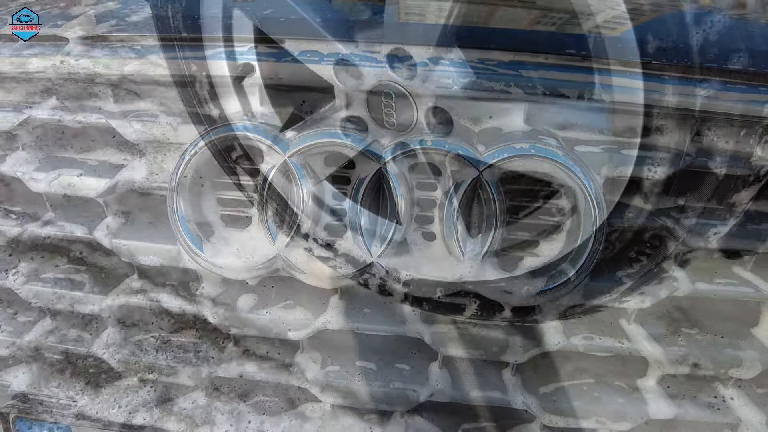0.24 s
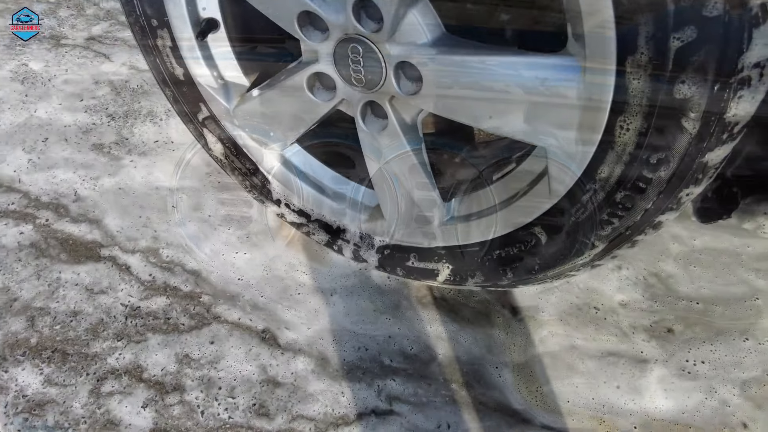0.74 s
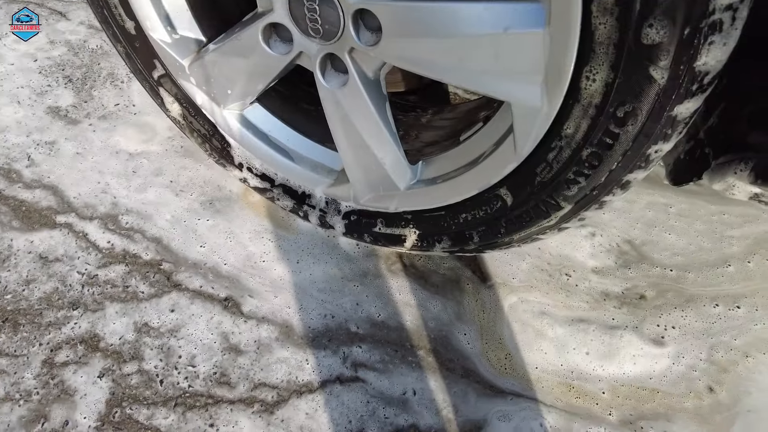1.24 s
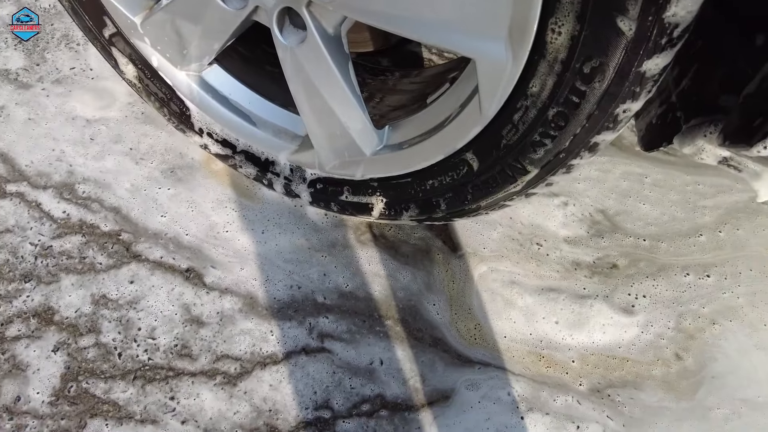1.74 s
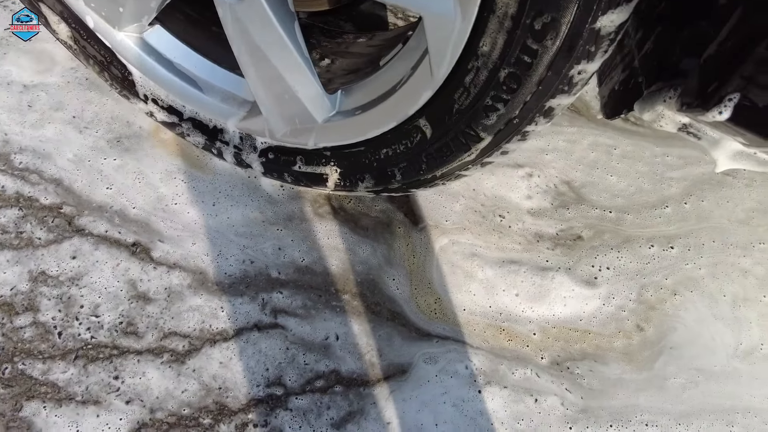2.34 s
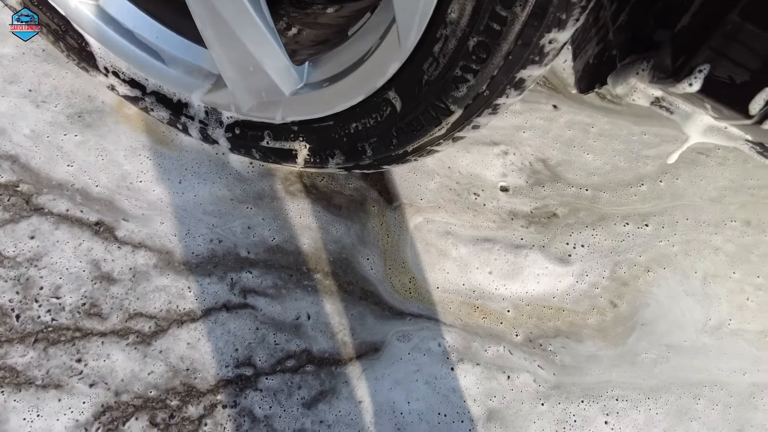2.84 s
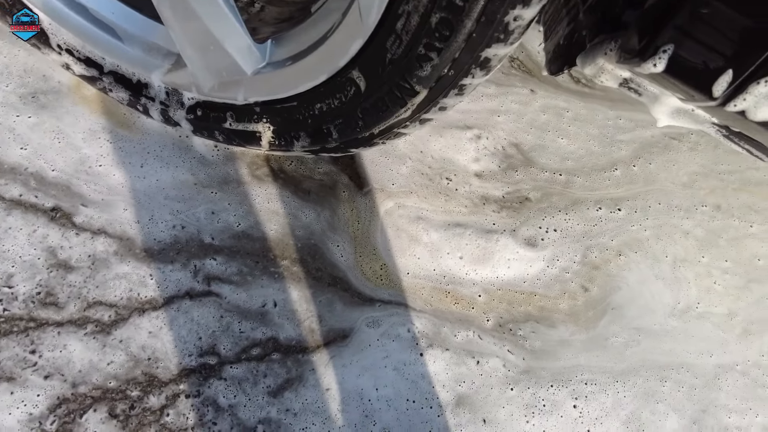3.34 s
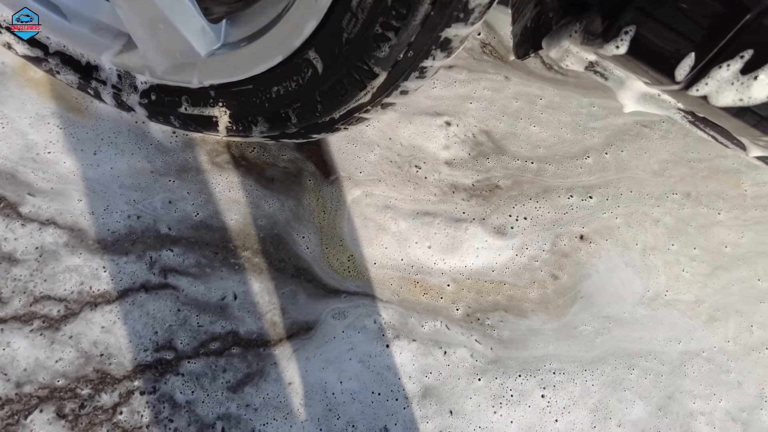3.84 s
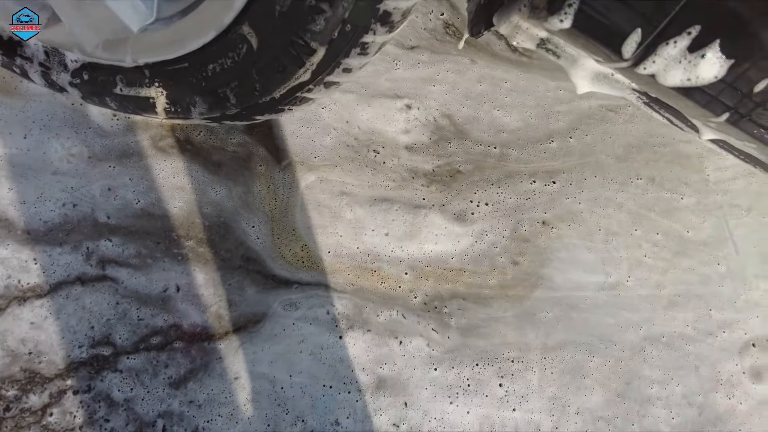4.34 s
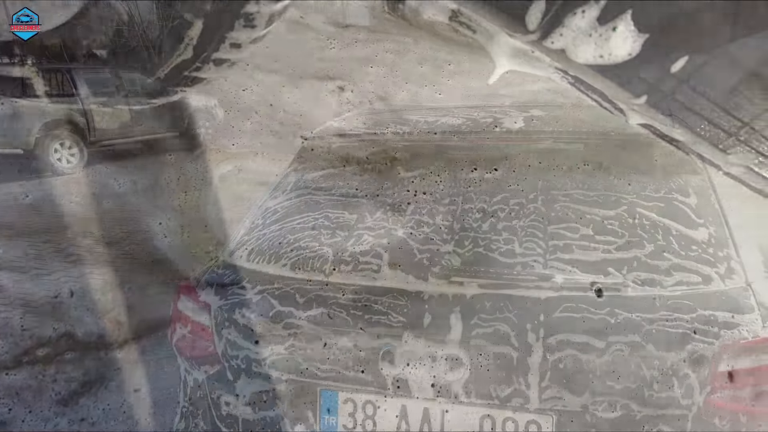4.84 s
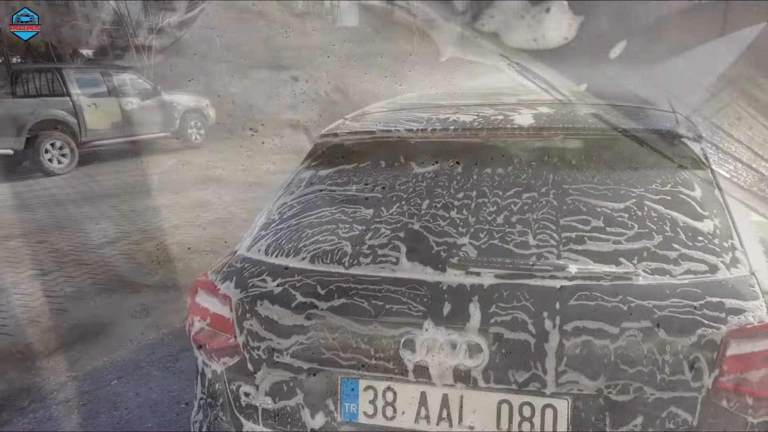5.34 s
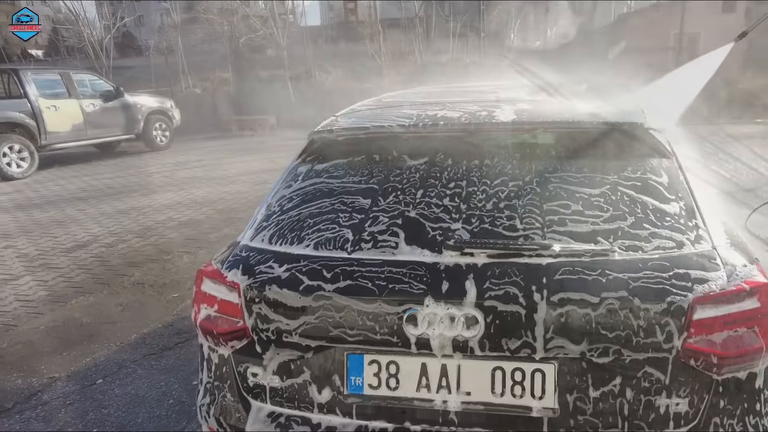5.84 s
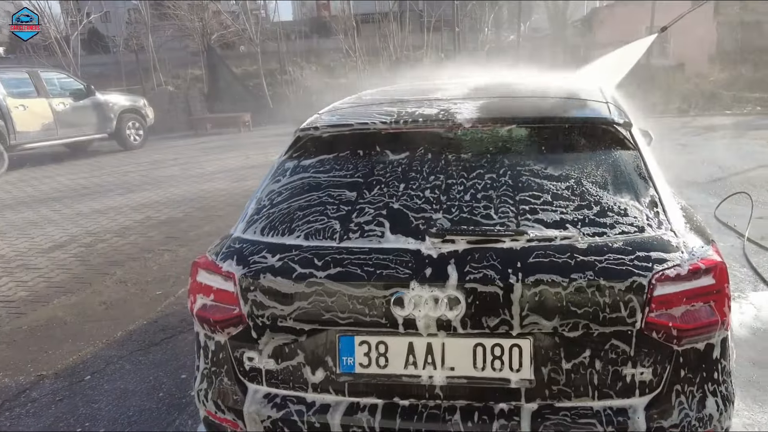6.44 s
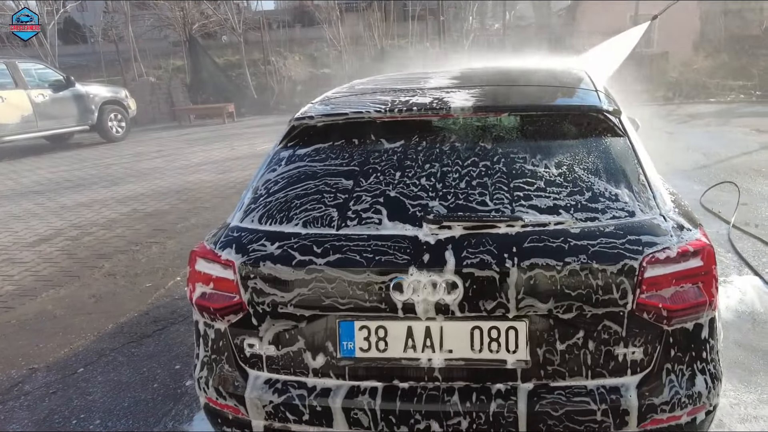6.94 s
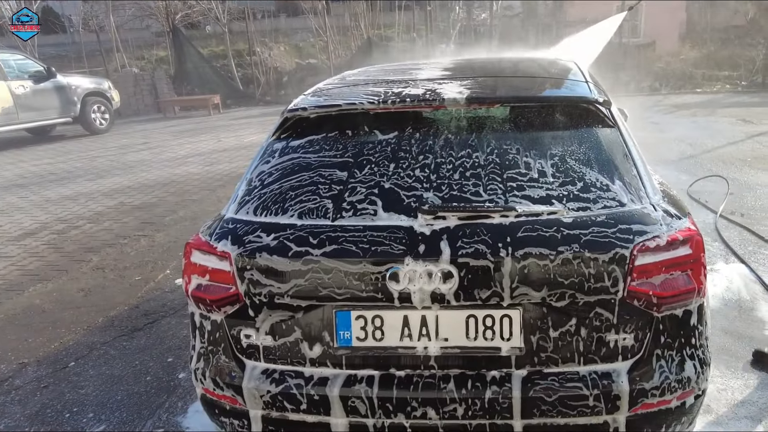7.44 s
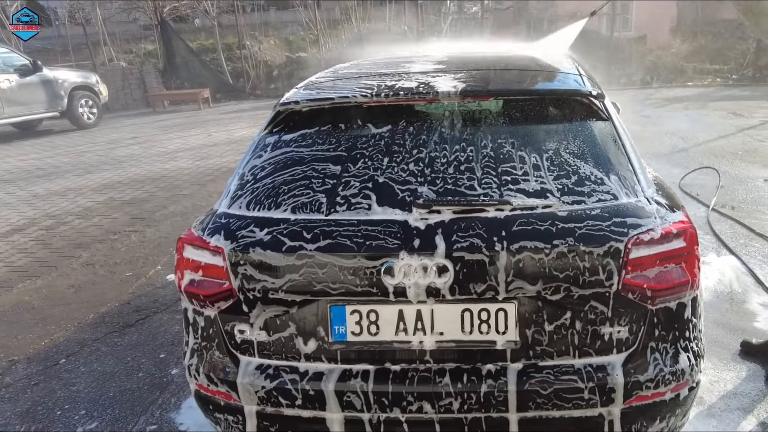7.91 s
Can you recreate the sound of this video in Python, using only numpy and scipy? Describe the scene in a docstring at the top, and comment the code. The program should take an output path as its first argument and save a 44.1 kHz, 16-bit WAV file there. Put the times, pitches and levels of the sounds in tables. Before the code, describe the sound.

After a split second of wind, a pressure washer jet cuts in close to a stereo microphone, hissing and splashing on a car wheel. The hiss swishes and turns hollow as it moves into the wheel well, growing louder. A hard cut brings a softer, more distant spray on the roof, which swells with a brief drumming boom on the rear, then eases. A faint pump hums underneath, outdoors.

```python
"""A pressure washer rinses a car outdoors, heard through a stereo microphone. Hard cuts join a moment of
wind, the jet close up on a wheel, and the jet farther off on the roof, briefly drumming on the rear window.
The nozzle hisses, droplets splash and drum, and wheel well and panels resonate. Echoes off wet ground and
bodywork comb the hiss as the lance moves; the piston pump hums and wind nudges the microphone."""
import sys
import numpy as np
from scipy import signal
from scipy.fft import rfft, irfft
from scipy.io import wavfile
from scipy.ndimage import uniform_filter1d

SR = 44100
rng = np.random.default_rng(int(sys.argv[2]) if len(sys.argv) > 2 else 0)


def transcribe(signal):
    """Save signal, clipped to [-1, 1], as a 16-bit WAV file at the path in sys.argv[1]."""
    frames = np.atleast_2d(signal).T
    limited = np.clip(frames, -1, 1)
    pcm = np.round(limited * 32767).astype(np.int16)
    wavfile.write(sys.argv[1], SR, pcm)


N = 360297
TIME = np.arange(N) / SR
HZ, FRAME_S, _ = signal.stft(TIME, SR, nperseg=1024, noverlap=768)

# aim at the wheel [t/s, depth (0 on the face, 1 deep in the well), bodywork echo delay/ms, its share]
AIM = [(.2, 0, 1.95, .13), (.6, .02, 1.95, .12), (1.8, .61, 1.68, .13), (2.7, .615, 1.58, .06),
       (3.2, .77, 1.48, .06), (3.9, .89, 1.3, .13), (4.15, .93, 1.12, .15), (4.32, .98, 1.01, .34),
       (4.45, 1.03, .92, .3), (4.58, 1, .79, .2), (4.8, .93, .69, .2), (5.15, .94, .7, .26)]


def gain_of(db):
    return 10 ** (np.asarray(db) / 20)


def unit_rms(x):
    return x / np.sqrt(np.mean(x ** 2) + 1e-20)


def over_hz(points):
    """A spectrum table as a column over the frequency bins."""
    hz, value = np.transpose(points)
    return np.interp(np.log(HZ + 1), np.log(hz), value)[:, None]


def over_time(rows):
    """Each column of a curve table over the frames."""
    s, *columns = np.transpose(rows)
    return [np.interp(FRAME_S, s, column) for column in columns]


def to_spectra(x):
    return signal.stft(x, nperseg=1024, noverlap=768)[2]


def to_sound(z):
    return signal.istft(z, nperseg=1024, noverlap=768)[1][..., :N]


def colour(points, lo_hz=0, hi_hz=SR):
    """Gains that give white noise an rms of 1 within a band."""
    gain = gain_of(over_hz(points))
    return gain / np.sqrt(np.mean(gain[:, 0] ** 2 * ((HZ >= lo_hz) & (HZ <= hi_hz))))


def slow_noise(edge_hz):
    """Noise of rms 1 that dies away above edge_hz."""
    hz = np.fft.rfftfreq(N, 1 / SR)
    return unit_rms(irfft(rfft(rng.standard_normal(N)) / np.sqrt(1 + (hz / edge_hz) ** 6), N))


def bump(hz, width_hz):
    """Bell-shaped weight around a steady or moving frequency."""
    return np.exp(-((HZ[:, None] - hz) / width_hz) ** 2 / 2)


def swell(s, half_s):
    """A smooth rise and fall around the moment s."""
    return np.exp(-((FRAME_S - s) / half_s) ** 2)


def modes_db(modes):
    """Lift of steady resonances; negative dB is a hollow between them."""
    return sum(db * bump(hz, width_hz) for hz, width_hz, db in modes)


def between(start_s, end_s):
    """1 between two hard cuts, 0 outside."""
    return uniform_filter1d(1. * ((TIME >= start_s) & (TIME < end_s)), size=6)


def echo(delay_ms, share, blur_hz):
    """One reflection; the spray is a wide patch, so its treble comes back smeared."""
    hz, delay_s = HZ[:, None], np.array(delay_ms)[:, None] / 1000
    return share / np.sqrt(1 + (hz / blur_hz) ** 2) * np.exp(-2j * np.pi * hz * delay_s)


def comb(*echoes):
    """Direct sound plus reflections, at unchanged mean power."""
    return (1 + sum(echoes)) / np.sqrt(1 + sum(abs(e) ** 2 for e in echoes))


def open_air(level_db=-52):
    """Dull outdoor background while the trigger is released."""
    # ambience of the yard [f/Hz, level/dB]
    spectrum = [(30, 7.5), (150, -5), (300, -11), (1000, -9), (2000, -21), (4500, -35), (8000, -48),
                (16000, -45)]
    return gain_of(level_db) * to_sound(to_spectra(rng.standard_normal(N)) * colour(spectrum))


def wind():
    """Short low buffets on the microphone."""
    # puffs of wind [t/s, half length/s, level/dB, upper edge/Hz]
    gusts = [(.05, .09, -40, 75), (.95, .026, -35, 150), (3.99, .013, -36, 90), (4.86, .03, -34.5, 150),
             (5.13, .05, -33.5, 260), (6.9, .04, -62, 180), (8.02, .11, -53, 100)]
    buffets = sum(gain_of(db) * np.exp(-((TIME - s) / half_s) ** 2) * slow_noise(hz)
                  for s, half_s, db, hz in gusts)
    return signal.sosfilt(signal.butter(2, 15, "high", fs=SR, output="sos"), buffets)


def droplets(turns, drops_per_s, drop_db, sputter_db, throb):
    """Two streams of countless tiny impacts and a few big drops, pulsing with the pump's pistons."""
    big_drops = (rng.random((2, N)) < drops_per_s / SR) * rng.standard_normal((2, N))
    streams = rng.standard_normal((2, N)) + gain_of(drop_db) * big_drops
    pressure = 1 + throb * (np.cos(2 * np.pi * turns) + 0.24 * np.cos(8 * np.pi * turns))
    sputter = gain_of(sputter_db * (slow_noise(92) + 1.2 * slow_noise(11)))
    return to_spectra(unit_rms(streams * pressure * sputter))


def jet(strength, hiss, splash, drum, hiss_db, splash_db, drum_db, patchy_db, mist_hz):
    """Nozzle hiss, splash and drumming follow the jet's strength; a square strike lifts the last two."""
    # hits on a panel, grazing where negative [t/s, half length/s, extra splash/dB, extra drumming/dB]
    strikes = [(0.886, 0.14, 1.5, 2.5), (1.298, 0.28, 3, 4.5), (1.935, 0.18, 0, 2), (2.85, 0.5, -3, -1.5),
               (3.99, 0.13, -1, 1.5), (4.733, 0.084, 2.5, 2.5), (5.12, 0.059, 2, 4), (5.79, 0.031, -5, 3),
               (5.914, 0.072, -2, 11), (6.093, 0.098, 7.5, 12.5), (6.236, 0.054, 2, 7),
               (6.33, 0.058, 2, 14.5), (7.237, 0.25, 0.5, 3), (7.973, 0.12, -3.5, -5),
               (8.152, 0.06, -10, 4)]
    level_db, mist_db = over_time(strength)
    top_db = (mist_db - mist_db.mean()) * over_hz([(mist_hz[0], 0), (mist_hz[1], 1)])  # mist is bright
    more_splash, more_drum = sum(np.outer(extra_db, swell(s, half_s)) for s, half_s, *extra_db in strikes)
    parts = [colour(hiss, 2500, 7000) * gain_of(hiss_db + top_db),
             colour(splash) * gain_of(splash_db + more_splash),
             colour(drum) * gain_of(drum_db + more_drum)]
    patch = np.outer(np.hanning(14), np.hanning(22))  # bins by frames
    flicker = unit_rms(signal.fftconvolve(rng.standard_normal(top_db.shape), patch, "same"))
    return np.sqrt(sum(part ** 2 for part in parts)) * gain_of(level_db + patchy_db * flicker)


def microphone(streams, likeness, balance, bearing):
    """The spray reaches two coloured ports, one a little before the other, and only partly alike."""
    # the microphone's widening of the stereo image [f/Hz, factor]
    widening = [(100, 15), (300, 12), (600, 8), (800, 13), (930, 26), (1060, 10), (1170, 5), (1240, 1.2),
                (2000, .8), (3000, 1.2), (5000, 1)]
    # resonances of its ports [f/Hz, width/Hz, level/dB]
    port_modes = [(1050, 214, 0.5), (1200, 178, 3.5), (1700, 60, 2.2), (2230, 490, 0.5), (3020, 370, 3.5),
                  (3650, 300, 0.5), (4330, 274, 3), (6280, 810, 1), (7040, 370, -2), (7800, 350, 2),
                  (8600, 250, 0), (9370, 280, 3.5), (10840, 200, 2.5)]
    drum_ms, hiss_ms, pan_db, focus = over_time(bearing)
    treble = over_hz([(1000, 0), (2000, 1)])
    lead_ms = drum_ms + (hiss_ms - drum_ms) * treble
    half_phase = np.pi * HZ[:, None] * lead_ms / 1000
    turn = np.exp(1j * np.arctan2(over_hz(widening) * np.sin(half_phase), np.cos(half_phase)))
    alike = np.clip(over_hz(likeness) + focus * treble, 0, 1)
    common, apart = np.sqrt((1 + alike) / 2) * streams[0], np.sqrt((1 - alike) / 2) * streams[1]
    lean = gain_of((over_hz(balance) + pan_db) * over_hz([(60, 0.15), (200, 0.73)]))  # bass stays central
    pair = np.array([(common + apart) * turn * lean, (common - apart) / turn])
    return pair * gain_of(modes_db(port_modes)) * np.sqrt(2 / (1 + lean ** 2))


def with_aim(face, deep, bend=1):
    """A value that glides as the jet moves from the face of the wheel into the well."""
    return face + (deep - face) * over_time(AIM)[0] ** abs(bend)


def spokes(count=4):
    """Brief bright echoes off the spokes; they come and go and glide, so the hiss swishes."""
    glints = []
    for delay_ms, glide_ms, phase in rng.uniform([.8, -.5, 0], [3.5, .5, 1], (count, 3)):
        facing = np.sin(2 * np.pi * (FRAME_S / delay_ms + phase))
        glints.append(echo([delay_ms + glide_ms * np.sin(FRAME_S)], share=.09 * facing, blur_hz=9000))
    return sum(glints) * over_hz([(1200, 0), (2400, 1)])


def wheel_rings():
    """The wheel well hoots and the rim rings; brief bands of brighter hiss glide, the rising ones with the
    phasing sweep as the bodywork echo shortens."""
    # modes of wheel and well [face f/Hz, deep f/Hz, bend of glide, width/Hz, face level/dB, deep level/dB]
    rings = [(300, 426, 1, 108, 0, -4), (398, 254, 2.7, 36, 5, 1.5), (710, 680, 1.9, 76, -7, 3.6),
             (1106, 406, 1.05, 112, 4.5, 5), (1380, 960, 0.31, 38, -8, -1.5), (1540, 1290, 1.3, 50, 3, 2.5)]
    # brief gliding bands of brighter hiss; the rising ones follow the phasing sweep as the bodywork echo
    # shortens [t/s, half length/s, f/Hz, glide/(Hz/s), width/Hz, level/dB]
    bright_bands = [(0.21, 0.28, 850, 0, 110, 1), (0.65, 0.57, 1700, -30, 67, 1), (.75, 0.88, 600, -70, 42, 2.5),
                    (0.95, 0.25, 1255, -200, 40, 3.5), (0.6, 0.4, 2600, 0, 300, 1.5),
                    (0.94, 0.22, 2170, -400, 70, 6.5), (1.06, 0.11, 2800, 0, 450, 1.5),
                    (1.86, 0.19, 2000, 0, 160, 3.5), (2.4, .55, 2100, 0, 120, 3),
                    (2.8, 0.71, 1320, -125, 43, 2.5), (2.9, 0.64, 608, 0, 31, 7), (4.1, 1, 880, -130, 90, 5),
                    (2.45, .4, 6370, 0, 110, 2.5), (2.6, 0.17, 5800, -0.5, 130, 2),
                    (2.78, .16, 5800, 0, 770, 2.5), (3.3, 0.55, 6800, 0, 1200, 3),
                    (3.2, .4, 14500, 0, 1500, 2.5), (4.06, 0.21, 560, 0, 27, 9), (3.93, .14, 5000, 0, 1100, 1.5),
                    (4.39, 0.22, 1020, -200, 31, 3.5), (4.33, 0.056, 3260, 1494, 100, 6.5),
                    (4.36, 0.091, 4160, 1600, 150, 4), (4.53, 0.12, 5250, 2200, 140, 6.5),
                    (4.56, .12, 3620, 1900, 130, 4), (4.52, .11, 2680, 1400, 90, 4),
                    (4.56, .17, 1820, 600, 77, 4.5), (4.65, .09, 4430, 0, 150, 5),
                    (4.88, 0.15, 4750, -900, 150, 3.5), (4.6, .11, 7950, 2500, 250, 1),
                    (4.86, .13, 8700, 0, 550, 3.5)]
    # the arch, ringing once the jet reaches into it [f/Hz, width/Hz, level/dB]
    arch_modes = [(320, 62, -4), (463, 20, 7), (540, 33, -10), (810, 90, -4.5), (1075, 54, 9),
                  (1770, 69, -7)]
    ring_db = sum(with_aim(face_db, deep_db, bend) * bump(with_aim(face_hz, deep_hz, bend), width_hz)
                  for face_hz, deep_hz, bend, width_hz, face_db, deep_db in rings)
    band_db = sum(db * swell(s, half_s) * bump(hz + glide * (FRAME_S - s), width_hz)
                    for s, half_s, hz, glide, width_hz, db in bright_bands)
    return gain_of(ring_db + band_db + modes_db(arch_modes) * swell(s=4.81, half_s=0.42))


def yard(x, count=9, share=.13):
    """Adds faint dull echoes off the car and the walls around, their paths drifting as the lance moves."""
    dull = signal.sosfilt(signal.butter(1, 2200, fs=SR, output="sos"), x)
    delays_s, echoes = np.geomspace(.004, .03, count), np.zeros_like(x)
    for delay_s, (place, drift, sign) in zip(delays_s, rng.uniform(-1, 1, (count, 3))):
        earlier = TIME - delay_s * (1 + .1 * place) - .0004 * drift * TIME
        echoes += np.sign(sign) * share * np.array([np.interp(earlier, TIME, side) for side in dull])
    return x + echoes


def wheel_spray(turns):
    """The jet on rim and tyre, close to the microphone; moving echoes give it a slow phasing sweep."""
    # jet strength as the lance nears and leaves [t/s, level/dB, relative fine mist/dB]
    strength = [(0.18, -41.5, -4.5), (0.6, -36, -4.5), (1.11, -35.5, -5.5), (2.14, -36, -7.5),
                (2.85, -35.5, -9.5), (2.99, -36, -7), (3.76, -38, -6), (4.17, -36, -6), (4.33, -32.5, -6),
                (4.54, -31.5, -8), (4.69, -31.5, -5), (5.0, -31.5, -8.5), (5.17, -36.5, -8)]
    # spectra of nozzle hiss, splash and drumming [f/Hz, level/dB]
    hiss = [(30, -1.5), (85, -7), (125, -1), (200, -3.5), (265, -14), (900, -11.5), (2300, 0), (3200, 0.5),
            (5000, 0.5), (7000, -1), (9500, -3.5), (12000, -3.5), (14000, -6.5), (16000, -6)]
    splash = [(600, -42), (950, -2), (1200, -4.5), (1450, -2.5), (1800, -0.5), (2200, -10), (3000, -33.5)]
    drum = [(120, -22), (270, -3), (380, 0.5), (520, 1.5), (750, 5), (950, -2), (1400, -37)]
    # stereo image [f/Hz, left-right likeness] and [f/Hz, leftward lean/dB]
    likeness = [(60, .99), (200, .97), (400, .95), (650, .9), (850, .8), (960, .88), (1150, .72),
                (1350, .9), (2000, .72), (2800, .6), (3500, .3), (4400, .35), (6000, .2), (16000, .2)]
    balance = [(60, -1), (92, -1.5), (140, -1), (210, 2), (330, 2.5), (500, 4), (770, 3), (1170, 5),
               (1790, -0.5), (2740, 4.5), (4190, 2.5), (6410, 6), (9810, 9), (15000, 0)]
    # jet's bearing to the left [t/s, drumming lead/ms, hiss lead/ms, lean/dB, extra treble likeness]
    bearing = [(.2, .066, .08, .2, -.1), (1.2, .068, .075, .2, -.15), (2.1, .054, .038, -.3, -.1),
               (3, .039, .022, -.3, -.1), (3.8, .026, .035, -.5, -.25), (4.15, .02, -.01, -1.3, -.15),
               (4.37, .02, -.022, -2.2, .15), (4.65, .035, .008, -1.1, .15), (5.1, .032, .005, -1.3, .15)]
    water = droplets(turns, drops_per_s=600, drop_db=5.0, sputter_db=0.34, throb=0.01)
    shape = jet(strength, hiss, splash, drum, hiss_db=0.18, splash_db=-4.0, drum_db=-5.0,
                patchy_db=1.0, mist_hz=(5500, 10000))
    ground_ms = np.outer([1, 1.058], with_aim(face=1.2, deep=2.65))  # a longer way to the right port
    _, body_ms, body_share = over_time(AIM)
    curvature = np.exp(1j * np.radians(75))  # curved bodywork shifts its echo's phase
    off_ground = echo(ground_ms, share=.46, blur_hz=1900)
    off_body = echo([body_ms], share=body_share, blur_hz=6000) * curvature
    off_both = echo(ground_ms + body_ms, share=0.069, blur_hz=2200)
    paths = comb(off_ground, off_body, off_both, spokes())
    spray = microphone(water, likeness, balance, bearing) * shape
    return yard(to_sound(spray * wheel_rings() * paths))


def pump(turns):
    """Hum of the piston pump, each order wavering by itself."""
    # harmonics of the hum [multiple of the piston rate, level/dB]
    orders = [(1, 0), (2, -3.7), (3, -7), (4, -15), (5, -11)]
    wavers_db = [1.5 * slow_noise(5) for _ in orders]
    hum = sum(gain_of(db + waver_db) * np.sin(2 * np.pi * (order * turns + rng.random()))
              for (order, db), waver_db in zip(orders, wavers_db))
    return np.sqrt(2) * hum


def roof_spray(turns):
    """The jet farther off, fanning over roof and rear window; it fizzes brightly as it skims the roof."""
    # jet strength [t/s, level/dB, relative fine mist/dB]
    strength = [(5.22, -54, -2.5), (5.45, -52.5, -4.5), (5.9, -44.5, 0.5), (6.2, -44, -0.5),
                (6.55, -48.5, -4.5), (7.15, -51, -5), (7.72, -52.5, -6), (8.16, -45, -1)]
    # spectra of nozzle hiss, splash and drumming [f/Hz, level/dB]
    hiss = [(25, 8.5), (55, -8), (190, -5.5), (260, -1.5), (900, -14), (2300, 0.5), (3200, -2),
            (5000, -0.5), (7000, -1), (9500, -1.5), (12000, -4), (14000, -7), (16000, -6)]
    splash = [(600, -26), (950, -5), (1200, 0), (1450, -1.5), (1800, -0.5), (2200, -10), (3000, -20.5)]
    drum = [(120, -31), (270, -14.5), (380, -4), (520, 0), (750, -1.5), (950, -6), (1400, -33)]
    # stereo image [f/Hz, left-right likeness] and [f/Hz, leftward lean/dB]
    likeness = [(60, 0.99), (92, 0.92), (140, 0.99), (210, 0.89), (330, 0.99), (500, 0.81), (770, 0.88),
                (1170, 0.85), (1790, 0.98), (2740, 0.79), (4190, 0.37), (6410, 0.34), (9810, 0.095),
                (15000, -0.38)]
    balance = [(60, 0.0), (99, 2), (160, 1), (270, 3), (450, 3.5), (740, 4.5), (1220, 4), (2010, 2.5),
               (3330, 4), (5500, -0.5), (9080, 0), (15000, -1)]
    # jet's bearing to the left [t/s, drumming lead/ms, hiss lead/ms, lean/dB, extra treble likeness]
    bearing = [(5.4, -.027, -.03, -.8, 0), (6.1, -.014, -.03, -2, .05), (7.2, -.018, -.026, -2.1, 0),
               (8.1, -.008, -.022, -2.4, .05)]
    # echo by the roof [t/s, delay/ms]
    echo_delay = [(5.2, 2.1), (7, 2.1), (8.2, 1.87)]
    # modes of roof and rear window [f/Hz, width/Hz, level/dB]
    panel_modes = [(220, 29, 5), (494, 28, 3), (700, 40, 2), (1100, 50, -1), (1680, 70, 1.5),
                   (2640, 110, -1), (2900, 77, 2), (3680, 110, -1.5), (3970, 72, 2)]
    water = droplets(turns, drops_per_s=370, drop_db=3.0, sputter_db=0.5, throb=.02)
    shape = jet(strength, hiss, splash, drum, hiss_db=-2.5, splash_db=-5.0, drum_db=-5.0,
                patchy_db=0.5, mist_hz=(9000, 12500))
    skim_db = np.interp(FRAME_S, [6, 6.6, 7.2, 7.8], [0, 2.5, 2.5, 0])
    fizz = gain_of(skim_db * (bump(8000, width_hz=320) + bump(9400, width_hz=320)))
    paths = comb(echo(over_time(echo_delay), share=0.055, blur_hz=3500))
    spray = microphone(water, likeness, balance, bearing) * shape
    return yard(to_sound(spray * fizz * gain_of(modes_db(panel_modes)) * paths))


def tailgate(peak_s=6.045, level_db=-39, attack_s=0.036, fade_db_per_s=105, rough_db=2):
    """The hollow panel booms unevenly as the jet hits it square on, and fades as the jet moves off."""
    # boom of the panel [f/Hz, level/dB]
    spectrum = [(40, -16), (70, -5), (100, -12), (125, 1), (155, 4.5), (210, -3), (380, -3), (600, -14),
                (1500, -40)]
    boom = to_sound(to_spectra(rng.standard_normal(N)) * colour(spectrum))
    attack = np.exp(-(np.minimum(TIME - peak_s, 0) / attack_s) ** 2)
    fade_db = fade_db_per_s * np.maximum(TIME - peak_s, 0)
    return boom * attack * gain_of(level_db - fade_db + rough_db * slow_noise(35))


def scene(piston_hz=73.5):
    """A lull, close by the wheel, then back from the roof; the pistons drive both hum and jet throb."""
    turns = np.cumsum(piston_hz * (1 + 0.0026 * slow_noise(2.4))) / SR
    hum, buffets = pump(turns), wind()
    lull = open_air() + buffets
    at_wheel = wheel_spray(turns) + hum * gain_of(-67 + 3.15 * TIME) + buffets  # the hum swells
    at_roof = roof_spray(turns) + tailgate() + hum * gain_of(-73) + buffets
    return between(0, .146) * lull + between(.178, 5.171) * at_wheel + between(5.212, 8.2) * at_roof


def record(dry, edge_hz=15850):
    """The recorder's steep band limit."""
    lowpass = signal.firwin(601, edge_hz, window=("kaiser", 8), fs=SR)
    return signal.oaconvolve(dry, lowpass[None], "same")


dry = scene()
out = record(dry)
transcribe(out)
```